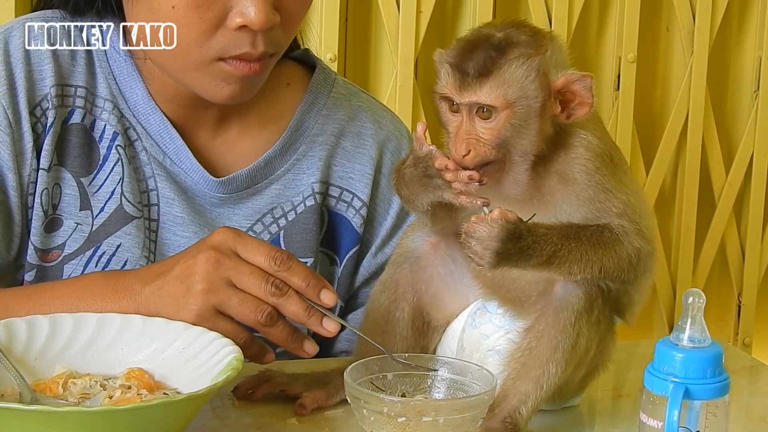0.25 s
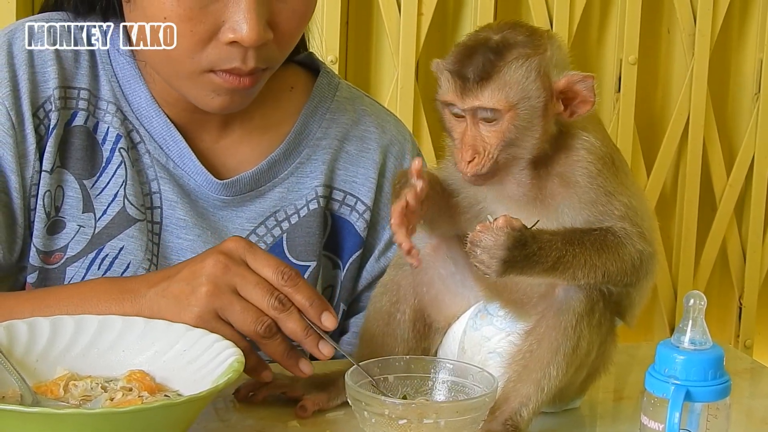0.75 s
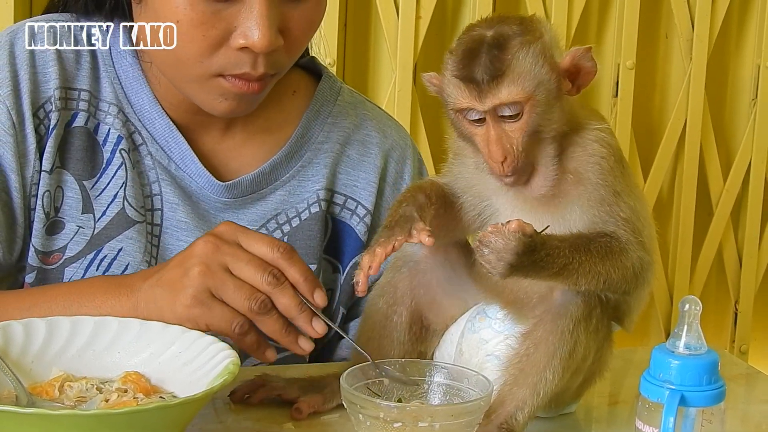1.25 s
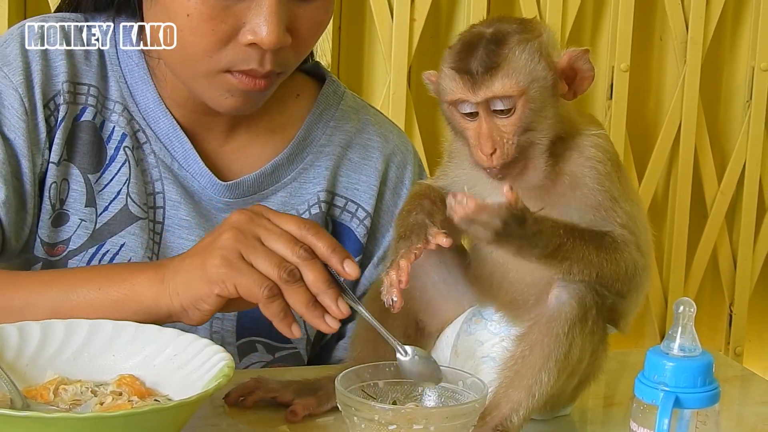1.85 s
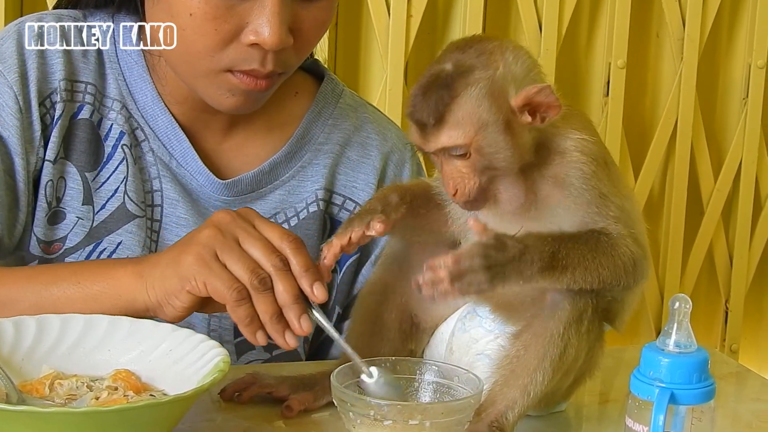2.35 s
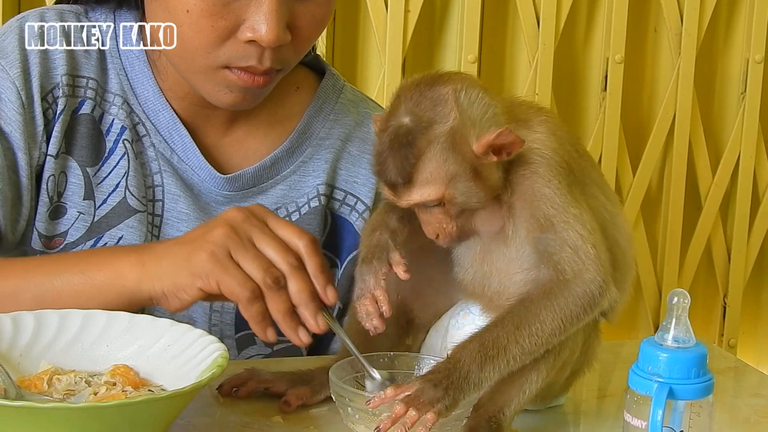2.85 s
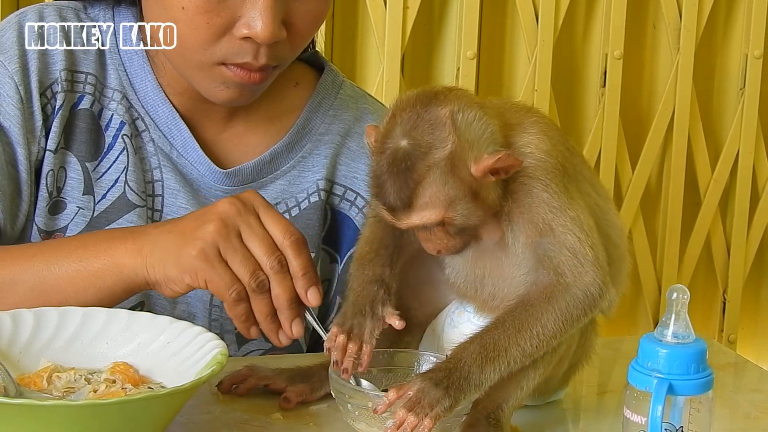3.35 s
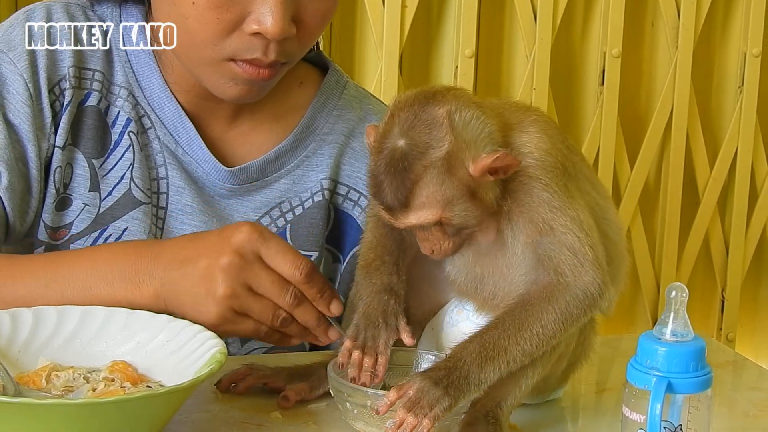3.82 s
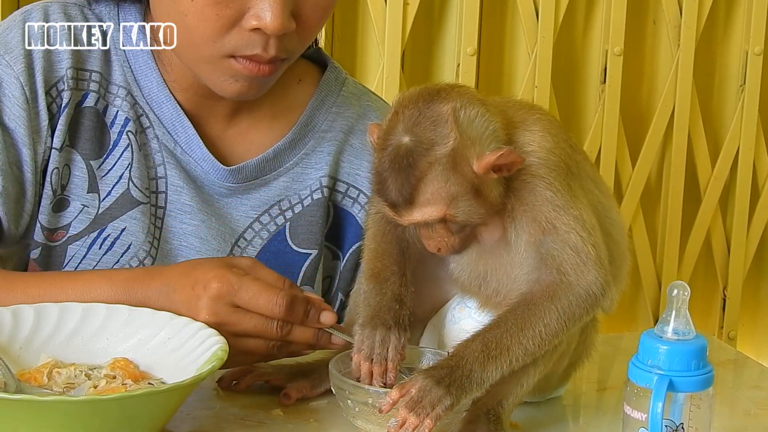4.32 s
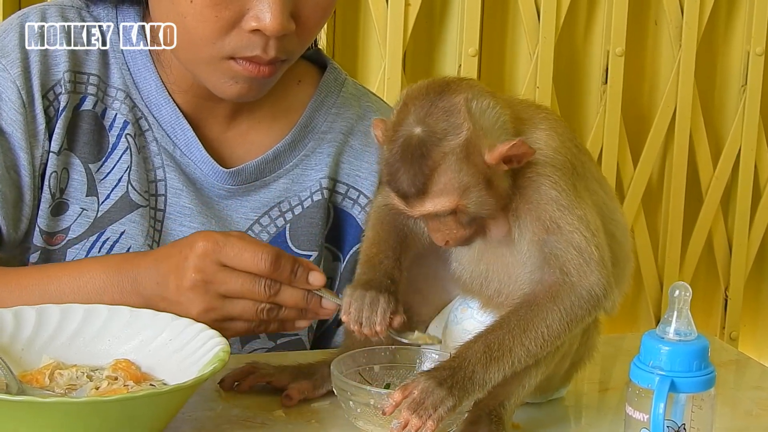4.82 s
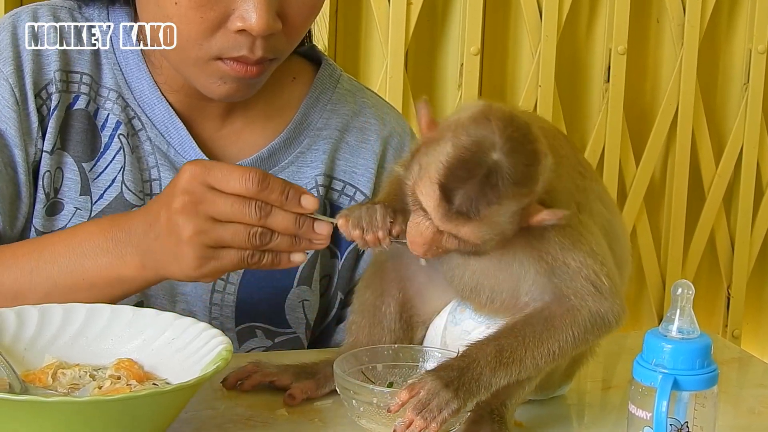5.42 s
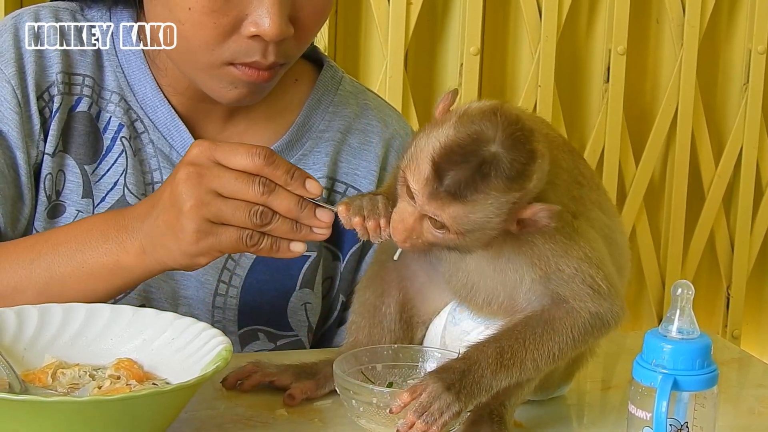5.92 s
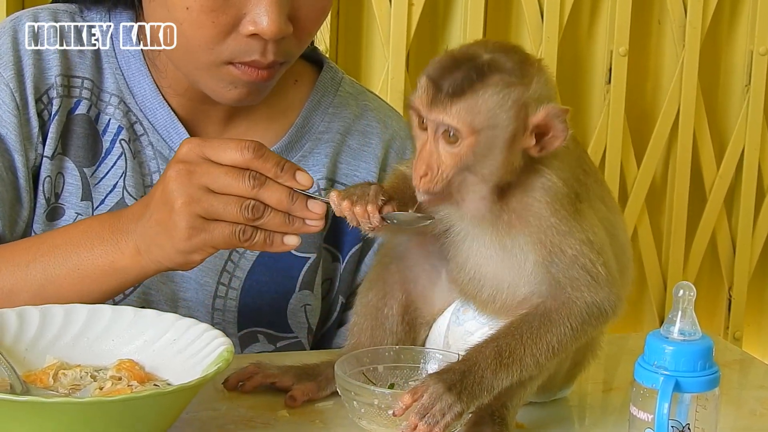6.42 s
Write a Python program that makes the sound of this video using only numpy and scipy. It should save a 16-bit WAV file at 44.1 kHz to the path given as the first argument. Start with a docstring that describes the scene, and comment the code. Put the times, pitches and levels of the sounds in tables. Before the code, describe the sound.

A soft outdoor wash, low rumble and the wavering hum of distant machines run throughout, heard from an echoing room. A small bird, some way off and slightly left, chirps about once a second from 0.4 seconds, each chirp a high whistle breaking into a buzz. Other birds answer with faint, thin slurs. A spoon clinks on a glass bowl with a quick double touch at 0.8 seconds, again at 1.7, and most clearly at 3.4, with tiny dull knocks around 1 and 3 seconds. At 5.6 seconds a young monkey near the microphone gives one short coo, the loudest sound: nearly pure at first, it sags in pitch, turns rough and fades into the room's echo. The bird chirps again at 6.2, and a soft, high, grainy hiss comes in from 6.3 seconds to the end.

```python
"""Spoon-feeding a young monkey

A young monkey, fed in an echoing room, gives one loud coo that sags in pitch and breaks up rough.
The spoon clinks on a glass bowl. Further off a small bird chirps about once a second, a whistle
into a buzz, and others answer faintly. Under it all lies a bed of outdoor wash, rumble and the
hum of distant machines; a high hiss comes in at the end."""
import sys
import numpy as np
from scipy import signal
from scipy.fft import rfft, irfft, next_fast_len
from scipy.io import wavfile

SR = 44100
rng = np.random.default_rng(int(sys.argv[2]) if len(sys.argv) > 2 else 0)


def generate_wav(sig):
    """Save sig (samples, or channels by samples) to the path in sys.argv[1] as 16-bit PCM at SR."""
    pcm = np.round(np.clip(np.atleast_2d(sig).T, -1, 1) * 32767).astype(np.int16)
    wavfile.write(sys.argv[1], SR, pcm)


N = 294179
TIME = np.arange(N) / SR

# how the monkey's throat colours the overtones: f/Hz, gain/dB
THROAT = [(1100, -43), (1550, -30), (1950, -34), (2350, -45.5), (3100, -42.5), (3500, -32), (4000, -46),
          (4750, -40.5), (5500, -32), (5950, -23.5), (6900, -27.5), (7750, -21.5), (8400, -42),
          (10500, -81)]
# spoon touches on the bowl: t/s, ring gain/dB, knock level/dB
CLINKS = [(0.76, -27.5, -30), (.768, -27.5, -35.5), (0.782, -38, -48), (1.021, -71, -44),
          (1.661, -30.5, -36.5), (3.001, -71, -40), (3.4488, -22, -35)]
# ringing modes of glass and spoon: f/Hz, level/dB, t60/s
BOWL_MODES = [(1394, -36, 0.04), (1560, -10, 0.031), (3783, -14.5, 0.066), (3816, -28, 0.67),
              (6784, -13, 0.33), (6760, -3, 0.052), (6970, -18, 0.039), (9400, -23, .02),
              (10310, -35, 0.076), (10570, -25, 0.026)]
# tone of the dull knock: f/Hz, gain/dB
KNOCK_EQ = [(300, -23), (700, 3), (950, 1), (1450, 9.5), (2600, -13), (4100, 4), (5200, -3), (7000, -7),
            (8500, -14), (11000, -38), (15000, -26)]
# near bird: t/s, level/dB, whistle f/Hz, whistle length/s, buzz top f/Hz, lower voice gain/dB
CHIRPS = [(0.444, -28, 5020, 0.037, 6950, -5), (1.461, -28.5, 5050, 0.031, 6590, -8),
          (2.453, -27.5, 5254, 0.047, 6640, -4.5), (3.989, -30, 4910, 0.052, 7030, -4),
          (4.989, -30.5, 5026, 0.047, 6400, -3.5), (6.194, -27, 4884, 0.048, 6680, -6)]
# the near bird's pips: t/s, f/Hz, level/dB
PIPS = [(4.096, 4396, -27.5), (6.556, 4810, -35.5)]
# far birds' slurred notes: t/s, length/s, start f/Hz, end f/Hz, level/dB
PEEPS = [(0.139, 0.09, 7290, 5900, -41), (0.949, 0.084, 6810, 6090, -39), (1.417, 0.081, 6340, 5970, -34),
         (2.035, 0.075, 7000, 5970, -37.5), (2.875, 0.073, 4230, 3900, -44.5),
         (3.142, 0.065, 6230, 5720, -36.5), (3.21, 0.094, 5480, 5540, -37.5), (3.658, .09, 6400, 6970, -39),
         (4.499, 0.063, 6710, 6640, -36.5), (5.002, 0.054, 6910, 6870, -37)]
# envelope of the hiss: t/s, level/dB
HISS_ENVELOPE = [(6.33, -40), (6.42, -42.5), (6.5, -36.5), (6.67, -37)]
# tone of the hiss: f/Hz, gain/dB
HISS_EQ = [(1500, -23), (2700, -11), (3600, -12.5), (4400, 1), (6000, 2), (7300, 1), (8100, -13.5),
           (10000, -34), (14000, -42)]
# lines of the machine hum: f/Hz, level before trim and swells/dB, wander/Hz
HUM_LINES = [(78.5, -66.5, 1.92), (158.4, -57, 2.25), (211.4, -58.5, 5.87), (334.5, -60.5, 1.4)]
# slow swells of the hum: t/s, length/s, lower lines' lift/dB, top line's lift/dB
HUM_SWELLS = [(1.945, 1.31, 3.5, 6.5), (4.855, 1.64, 5, 2)]
# tone of the outdoor wash: f/Hz, gain/dB
WASH_EQ = [(20, -56), (45, -16), (85, -7.5), (125, -10), (180, -2), (300, -4.5), (420, -9), (540, -12),
           (750, -11), (1100, -7), (2000, -11.5), (3600, -18.5), (4600, -13.5), (6800, -14), (9000, -32),
           (15500, -48)]
# tone of the rumble: f/Hz, gain/dB
RUMBLE_EQ = [(25, -27), (70, -1), (100, 1), (140, -23), (400, -71)]
# stereo image of diffuse sound: f/Hz, left-right likeness (0 to 1)
LIKENESS = [(30, 0.93), (700, 0.93), (1200, 0.85), (3000, 0.71), (6000, 0.43), (12000, 0.05)]
# reverb time of the room: f/Hz, t60/s
ROOM_DECAY = [(200, 0.97), (700, 0.75), (2000, 0.75), (4500, 0.81), (7000, 0.82), (12000, 0.57)]


def monkey(start_s=5.595, length_s=.378, top_hz=791.2, sag_hz_per_s2=2300, break_s=.28):
    """A nearly pure coo scoops up, holds, then sags ever faster; the voice breaks and fades."""
    t = np.arange(0, length_s, 1 / SR)
    broken_s = np.maximum(t - break_s, 0)
    rough = np.clip(.078 + 8.8 * broken_s, 0, 1)
    scoop = 45 * np.exp(-t / .0159)
    sag = sag_hz_per_s2 * np.maximum(t - .065, 0) ** 2
    last_dive = 60 * np.exp((t - length_s) / .016)
    jitter = 1 + .021 * rough * drift(t, 130)
    hz = (top_hz - scoop - sag - last_dive) * jitter
    phase = 2 * np.pi * np.cumsum(hz) / SR
    shimmer = 1 + .14 * rough * drift(t, 90)
    envelope = np.sqrt(2) * shimmer * signal.windows.tukey(len(t), .05)
    swell_db = -5.5 * np.maximum(1 - t / .21, 0)
    body_gain = amp(-16.5 + swell_db - 177.5 * broken_s)
    # the overtones come in later and fade more slowly than the fundamental
    overtone_gain = amp(-15 - 95 * broken_s) * np.minimum(t / .12, 1)
    overtones = np.zeros(len(t))
    for k in range(2, 16):
        # roughness darkens and frays the overtones; each also wavers on its own
        darken_db = 10 * rough * np.log2(k * hz / 4800)
        level_db = at_hz(THROAT, k * hz) - darken_db + drift(t, 8.4)
        rasp = .9 * (rough + .15) * drift(t, 350)
        overtones += amp(level_db) * np.sin(k * phase + rasp)
    body, edge = np.zeros((2, N))
    add(body, start_s, envelope * body_gain * np.sin(phase))
    add(edge, start_s, envelope * overtone_gain * overtones)
    # the overtones beam away from the microphone, so more of them comes back off the walls
    return (room(body, direct_db=-1.45, tail_db=-12, early_db=-17.5)
            + room(edge, direct_db=1, tail_db=-4.5, early_db=-3.5))


def spoon():
    """Each touch knocks briefly and rings the glass, which a hand soon damps."""
    out, t = np.zeros(N), np.arange(SR // 2) / SR
    ring = sum(amp(db - 60 * t / t60) * np.sin(2 * np.pi * hz * t) for hz, db, t60 in BOWL_MODES)
    attack = 1 - np.exp(-(t / .00018) ** 2)  # the blow takes a moment to build
    for s, ring_db, knock_db in CLINKS:
        knock = colour(rng.standard_normal(len(t)), KNOCK_EQ) * np.exp(-t / .0055)
        add(out, s, attack * (amp(ring_db) * ring + amp(knock_db) * knock))
    return room(out, direct_db=1.5, tail_db=-3, early_db=-6)


def near_bird(buzz_s=.088, flutter_hz=140, lower_hz=4380):
    """Each chirp arches through a whistle with a catch in it, then splits into two buzzing voices."""
    out = np.zeros(N)
    for s, db, hz, whistle_s, top_hz, lower_db in CHIRPS:
        t = np.arange(0, whistle_s, 1 / SR)
        progress = t / whistle_s
        arch = 1 - .16 * np.exp(-progress / .091) - .139 * progress ** 3 + .0202 * drift(t, 129.9)
        rise_db = 5 * (np.sin(np.pi * progress) + progress - 1)
        catch_db = 10 * np.exp(-((progress - .38) / .13) ** 2)
        add(out, s, amp(db - 5.5 + rise_db - catch_db) * whistle(hz * arch, taper=.029))
        t = np.arange(0, buzz_s, 1 / SR)
        progress = t / buzz_s
        flutter = np.sin(2 * np.pi * flutter_hz * t + 1.538 * drift(t, 50))
        upper = top_hz * (.885 + .0885 * flutter + .032 * drift(t, 306.4) - .4 * (progress - .5) ** 2)
        lower = lower_hz * (1.12 - .1 * progress + .0677 * flutter + .0467 * drift(t, 112))
        buzz = amp(-6.5) * whistle(upper, taper=.67) + amp(lower_db) * whistle(lower, taper=.71)
        add(out, s + whistle_s, amp(db) * buzz)
    lean_left = amp([[.7], [-.7]])
    return room(out, direct_db=-5.5, tail_db=0, early_db=-1.5) * lean_left


def pips(length_s=.0216, fall=.06, rasp=.023):
    """Tiny notes from the near bird that slip down a little in pitch."""
    out, t = np.zeros(N), np.arange(0, length_s, 1 / SR)
    for s, hz, db in PIPS:
        bend = 1 + fall * (.5 - t / length_s) + rasp * drift(t, 230)
        add(out, s, amp(db) * whistle(hz * bend, taper=.48))
    return room(out, direct_db=-1.5, tail_db=-7, early_db=-9)


def far_birds(rasp=.045):
    """Thin rasping slurs from other birds, blurred by the room."""
    out = np.zeros(N)
    for s, length_s, start_hz, end_hz, db in PEEPS:
        t = np.arange(0, length_s, 1 / SR)
        hz = np.linspace(start_hz, end_hz, len(t)) * (1 + rasp * drift(t, 200))
        add(out, s, amp(db) * whistle(hz, taper=.38))
    return room(out, direct_db=-11.5, tail_db=-7, early_db=-8.5)


def hiss():
    """A high, slightly grainy hiss swells up at the end."""
    times, levels_db = np.transpose(HISS_ENVELOPE)
    t = np.arange(times[0], N / SR, 1 / SR)
    noise = colour(mic_pair(rng.standard_normal((2, len(t)))), HISS_EQ)
    level_db = np.interp(t, times, levels_db) + .87 * drift(t, 32)
    return np.pad(noise * amp(level_db), ((0, 0), (N - len(t), 0)))


def background(hum_trim_db=-1.64, top_line_above_hz=280):
    """Distant machines hum and waver over a low rumble; the outdoor wash lifts a touch with them."""
    lower_db = hum_trim_db + sum(db * swell(s, length) for s, length, db, _ in HUM_SWELLS)
    top_db = hum_trim_db + sum(db * swell(s, length) for s, length, _, db in HUM_SWELLS)
    hum = np.zeros(N)
    for hz, db, wander_hz in HUM_LINES:
        level_db = db + (top_db if hz > top_line_above_hz else lower_db) + 2.44 * drift(TIME, 3.2)
        phase = 2 * np.pi * np.cumsum(hz + wander_hz * drift(TIME, 2)) / SR
        hum += np.sqrt(2) * amp(level_db) * np.sin(phase)
    wash = colour(mic_pair(rng.standard_normal((2, N))), WASH_EQ)
    wash *= amp(-44.5 + .12 * top_db + drift(TIME, 2.6))
    rumble = colour(rng.standard_normal(N), RUMBLE_EQ)
    rumble *= amp(-61.8 + 2 * drift(TIME, .796))
    return hum + wash + rumble


def room(x, direct_db, tail_db, early_db):
    """Direct sound, a cluster of early wall echoes, and a tail that dies band by band."""
    t = np.arange(SR) / SR
    hz, when, bands = signal.stft(rng.standard_normal((2, SR)), SR, nperseg=256)
    decay = amp(-60 * when / at_hz(ROOM_DECAY, hz)[:, None])
    tail = signal.istft(bands * decay, SR, nperseg=256)[1][:, :SR]
    tail *= np.clip((t - .008) / .047, 0, 1)  # pre-delay, then bloom
    early = rng.standard_normal((2, SR)) * (rng.random((2, SR)) < 500 / SR)  # 500 echoes a second
    early *= (t > .003) * np.exp(-t / .026)
    response = mic_pair(amp(tail_db) * unit(tail) + amp(early_db) * unit(early)) / np.sqrt(SR)
    return amp(direct_db) * x + signal.fftconvolve(x[None], response, axes=1)[:, :N]


def mic_pair(pair):
    """Two close microphones hear diffuse sound alike in the bass and less so in the treble."""
    size = next_fast_len(pair.shape[1])
    left, other = rfft(pair, size)
    likeness = np.clip(at_hz(LIKENESS, np.fft.rfftfreq(size, 1 / SR)), 0, 1)
    right = likeness * left + np.sqrt(1 - likeness ** 2) * other
    return irfft(np.array([left, right]), size)[:, :pair.shape[1]]


def whistle(hz, taper):
    """A bird's nearly pure tone on a pitch curve, faded in and out."""
    phase = 2 * np.pi * np.cumsum(hz) / SR
    return unit(np.sin(phase) + amp(-36) * np.sin(2 * phase)) * signal.windows.tukey(len(hz), taper)


def swell(start_s, length_s):
    """A rounded hump from zero to one and back."""
    return np.sqrt(np.clip(1 - (2 * (TIME - start_s) / length_s - 1) ** 2, 0, 1))


def drift(t, rate_hz):
    """Smooth random modulation of about unit size: sines scattered around the given rate."""
    speeds, phases = rng.random((2, 16, 1))
    coarse = np.linspace(t[0], t[-1], 3000)
    sines = np.sin(2 * np.pi * (rate_hz * 2 * speeds * coarse + phases))
    return np.interp(t, coarse, sines.sum(0)) / np.sqrt(8)


def colour(x, eq):
    """Shapes noise with an EQ curve and sets its rms to one."""
    size = next_fast_len(x.shape[-1])
    gain = amp(at_hz(eq, np.fft.rfftfreq(size, 1 / SR)))
    return unit(irfft(rfft(x, size) * gain, size)[..., :x.shape[-1]])


def at_hz(table, hz):
    """Reads a table on a log-frequency axis."""
    f, value = np.transpose(table)
    return np.interp(np.log(hz + 1), np.log(f), value)


def add(mix, s, sound):
    """Drops a sound into the mix at time s."""
    part = mix[round(s * SR):][:len(sound)]
    part += sound[:len(part)]


def amp(db):
    """Decibels to gain."""
    return 10 ** (np.asarray(db) / 20)


def unit(x):
    """Scales to an rms of one."""
    return x / np.sqrt(np.mean(x ** 2) + 1e-20)


def scene():
    """The stereo mix of all layers."""
    return near_bird() + pips() + far_birds() + monkey() + spoon() + hiss() + background()


def record(dry, cutoff_hz=15750):
    """The recorder's band limit: a steep high cut."""
    high_cut = signal.firwin(511, cutoff_hz, window=("kaiser", 9), fs=SR)
    return signal.oaconvolve(dry, high_cut[None], "same")


dry = scene()
out = record(dry)
generate_wav(out)
```